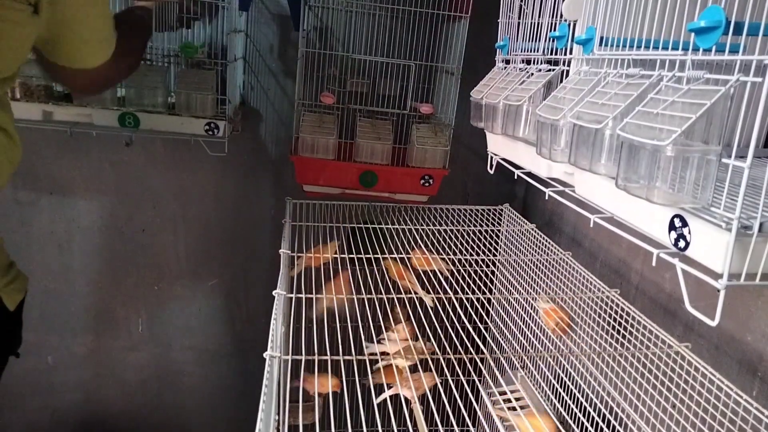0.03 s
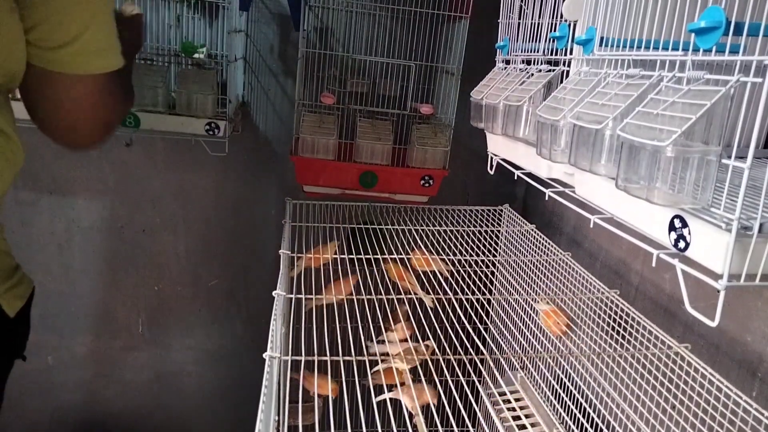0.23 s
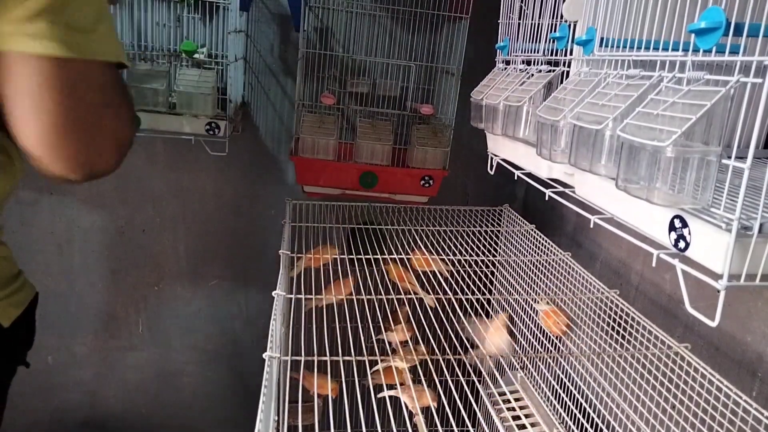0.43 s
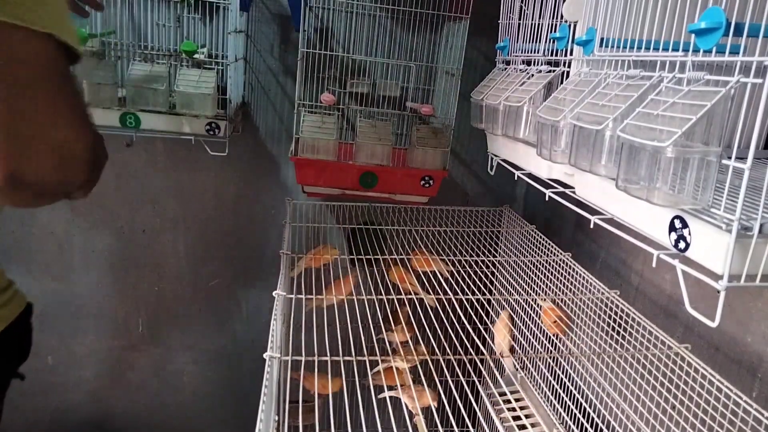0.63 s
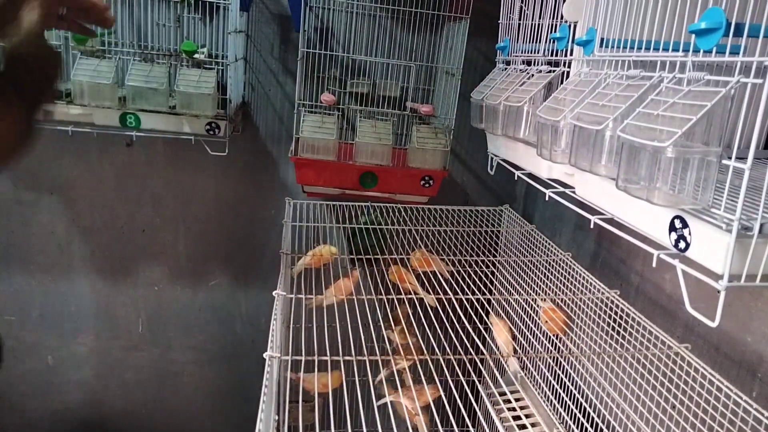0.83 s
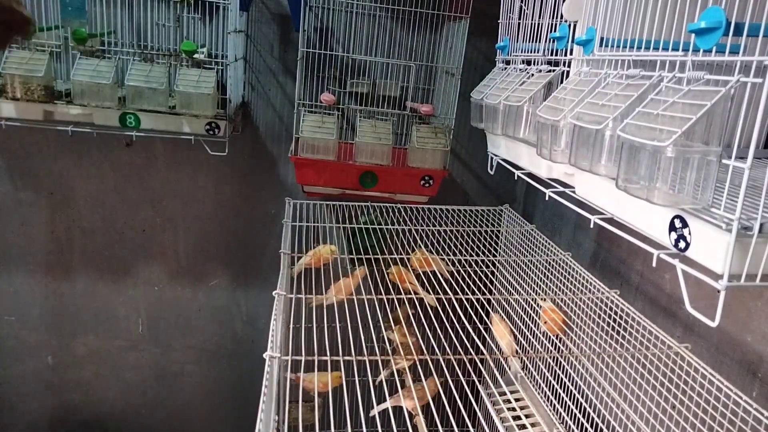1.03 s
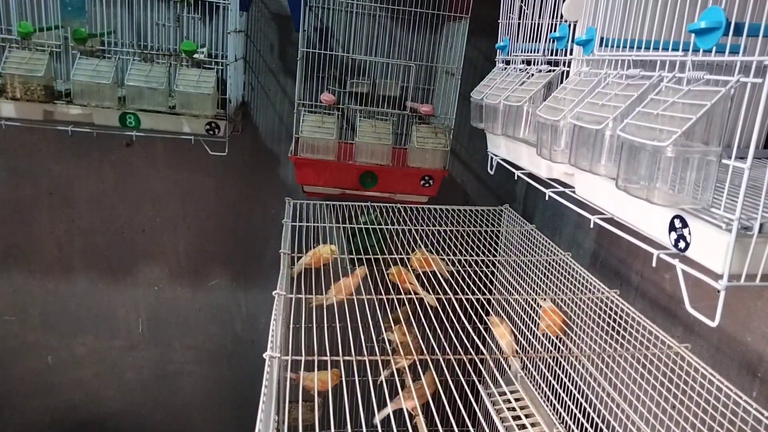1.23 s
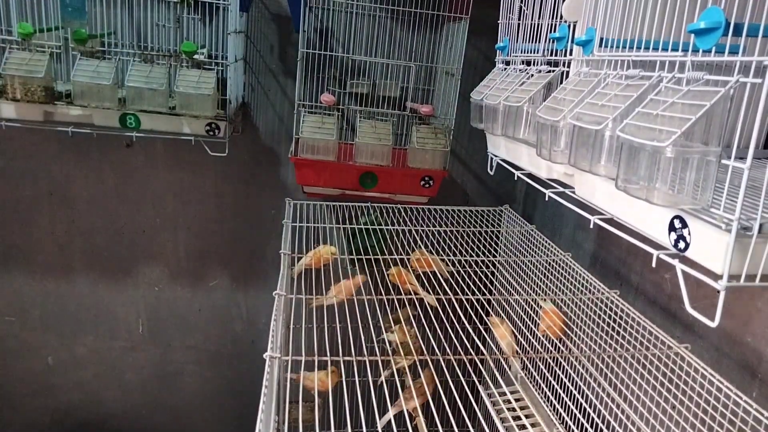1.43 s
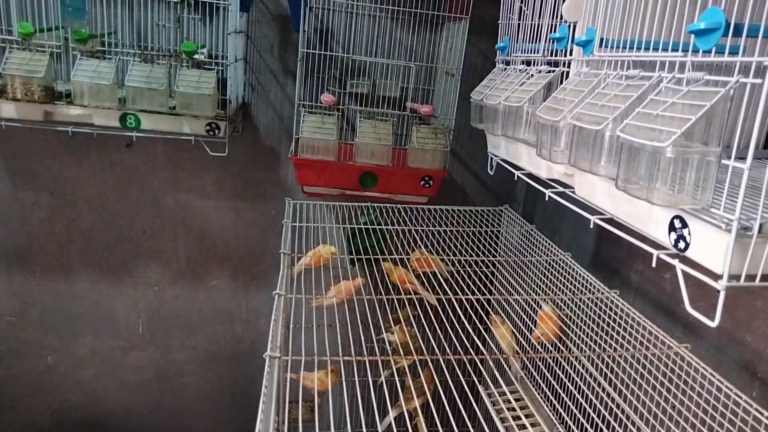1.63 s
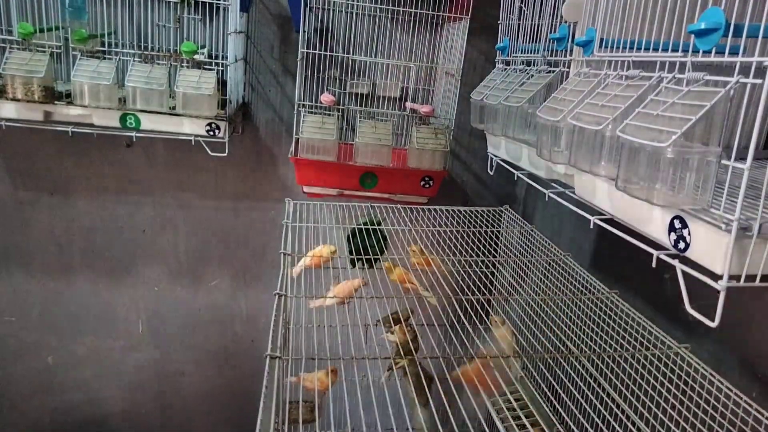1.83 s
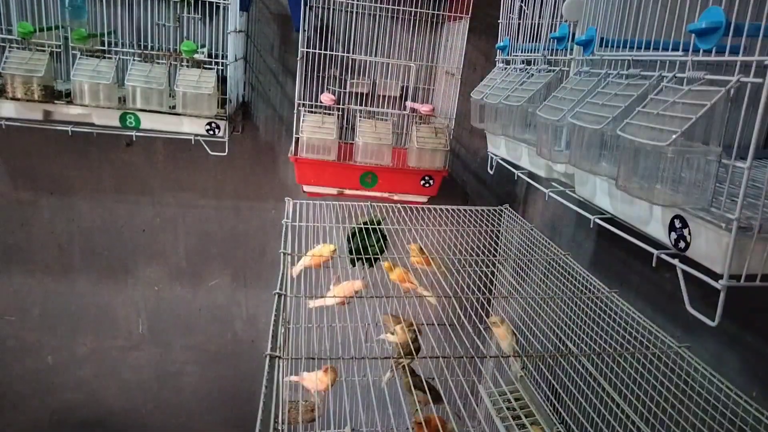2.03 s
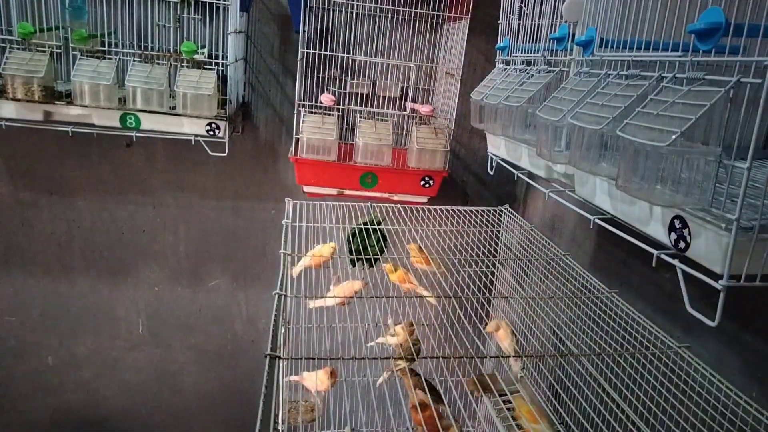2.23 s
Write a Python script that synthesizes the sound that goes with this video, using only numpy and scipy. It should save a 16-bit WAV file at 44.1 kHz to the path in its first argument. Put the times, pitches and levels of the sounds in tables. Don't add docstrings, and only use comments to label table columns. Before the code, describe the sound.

Canary chirps in a cage, close to a phone in a hard-walled room with faint hiss and rumble. From 0 to 0.7 s, feathers swish, claws tick on wire, husks chink and a plastic feeder scrapes hollowly. At 0.73-1.04 s one call rises, rough then clear, with a quick echo. Wings flutter at 1.42-1.6 s; overlapping squabbling chirps follow until 1.86 s, ending in a falling whistle. Rustles and ticks continue.

```python
import sys
import numpy as np
from scipy import signal
from scipy.fft import rfft, irfft
from scipy.io import wavfile

SR = 44100
rng = np.random.default_rng(int(sys.argv[2]) if len(sys.argv) > 2 else 0)


def generate_wav(sig):
    pcm = np.round(np.clip(np.atleast_2d(sig).T, -1, 1) * 32767).astype(np.int16)
    wavfile.write(sys.argv[1], SR, pcm)


def elevation(decibels):
    levels = np.asarray(decibels, float)
    return 10 ** (levels / 20)


N = 101165
T = np.arange(N) / SR
BIN_HZ = np.arange(N // 2 + 1) * SR / N


def shape(points, hz):
    p = np.array(points)
    return np.interp(np.log(np.maximum(hz, 1)), np.log(p[:, 0]), p[:, 1], left=-90)


def filtered_noise(gain):
    y = irfft(rfft(rng.standard_normal(N)) * gain, N)
    return y / y.std()


def noise(points):
    return filtered_noise(elevation(shape(points, BIN_HZ)))


def ring(hz, width_hz):
    return filtered_noise(1 / (1 + (2 * (BIN_HZ - hz) / width_hz) ** 2))


def walk(hz):
    return ring(0, 2 * hz)


def burst(start, rise, t60, bend=1):
    u = T - start
    attack = np.sin(np.clip(u / max(rise, 1e-4), 0, 1) * np.pi / 2) ** 2
    return attack * elevation(-60 * (np.maximum(u - rise, 0) / t60) ** bend)


# f/Hz, level/dB
HISS_COLOUR = [(250, 0), (978, -4), (4300, -17), (6500, -13.5), (8400, -2), (10500, -11.5), (15500, -11)]
# f/Hz, level/dB
RUMBLE_COLOUR = [(18, 2), (45, 0.5), (83, -8), (114, -20.5), (155, -12.5), (200, -21.5)]


def background():
    hiss = elevation(-65.5 + 1.3 * walk(5.6)) * noise(HISS_COLOUR)
    rumble = elevation(-60 + 2.43 * walk(12)) * noise(RUMBLE_COLOUR + [(400, -40)])
    return hiss + rumble


# t/s, rise/s, fade t60/s, level/dB, share of low colour/0-1
SWISHES = [(0, 0.01, 0.71, -54, .3), (0.308, 0.011, 0.95, -62.5, 1), (.41, 0.0083, .3, -56.5, 0.34),
           (.65, 0.0076, 1, -60.5, 0.78), (.703, .006, 0.088, -51, 0), (0.946, 0.011, 0.34, -47.5, 0.72),
           (1.233, 0.041, .3, -49, 0.45), (1.379, 0.013, 0.6, -60.5, 0.34),
           (1.728, 0.07, 0.27, -49.5, 0.65), (1.96, 0.04, 0.32, -51, 0.32),
           (2.047, 0.0059, 0.12, -58.5, 0.97), (2.253, 0.021, 0.19, -56, 0.4),
           (1.869, 0.0067, 0.74, -62, 0.4), (0.501, .04, 1, -66.5, 0), (1.158, 0.023, 0.9, -57.5, 0.28),
           (1.62, 0.035, 1, -62.5, 0.3), (1.47, .03, 1, -68, 0.9)]
# f/Hz, level/dB
BRIGHT_COLOUR = [(200, 3), (1000, -10.5), (5000, -19.5), (7000, -3.5), (8400, 4), (10000, -4.5),
                 (15500, -1)]
# f/Hz, level/dB
DULL_COLOUR = [(100, -8.5), (400, 0.5), (1200, 0), (3000, -0.5), (6000, -4), (8400, -4), (15500, -11)]


def swishes():
    bright, dull = noise(BRIGHT_COLOUR), noise(DULL_COLOUR)
    out = 0
    for start, rise, t60, db, dull_share in SWISHES:
        dull_share = np.clip(dull_share, 0, 1)
        friction = (1 - dull_share) * bright + dull_share * dull
        out = out + elevation(db) * burst(start, rise, t60, bend=1.283) * friction
    return out


# t/s, level/dB
DRAG = [
    (0, -71.5),
    (.25, -70),
    (0.292, -64),
    (0.344, -49),
    (.43, -59.5),
    (.5, -62),
    (.64, -65.5),
    (0.679, -54.5),
    (0.848, -75.5),
]
# f/Hz, bandwidth/Hz, level/dB
FEEDER_MODES = [
    (890, 96, -5.5),
    (966, 178, -3),
    (1430, 270, -12.5),
    (1975, 140, -18),
]


def feeder_drone():
    body = sum(elevation(db) * ring(hz, width_hz) for hz, width_hz, db in FEEDER_MODES)
    t, db = np.array(DRAG).T
    return body / body.std() * elevation(np.interp(T, t, db, right=-100) + 3.5 * walk(18))


# f/Hz, level/dB
BREATH_COLOUR = [(800, -17), (2000, -13), (5000, -2), (8000, 10), (11000, -4), (15500, 0)]


def voice(rows, partial_db, count):
    breath_db, rough_hz, edge_s = 1.5, 456, 0.0043
    flicker_db, fray = 0.8147, 0.2
    t, *tracks = np.array(rows).T
    hz, db, rough, tilt_db = (np.interp(T, t, track) for track in tracks)
    gate = np.clip(np.minimum(T - t[0] + edge_s, t[-1] + edge_s - T) / edge_s, 0, 1)
    jitter = 1 + 0.00427 * walk(58)
    phase = 2 * np.pi * np.cumsum(hz * jitter) / SR

    gains = []
    for k in range(1, count + 1):
        gains.append(elevation(partial_db(k, hz) + tilt_db * (k - 2)) * (k * hz < 16000))
    gains = np.array(gains)
    gains = gains / np.sqrt((gains ** 2).sum(axis=0) / 2)

    out = np.clip(rough, 0, 1) * elevation(breath_db) * noise(BREATH_COLOUR)
    for k, gain in enumerate(gains, 1):
        share = np.clip(rough * (1 + fray * k), 0, 1)
        steady = np.sin(k * phase)
        shake = walk(rough_hz * k / 4) * np.sin(k * phase) + walk(rough_hz * k / 4) * np.cos(k * phase)
        partial = np.sqrt(1 - share ** 2) * steady + share * shake / np.sqrt(2)
        out = out + gain * elevation(flicker_db * k * walk(42)) * partial
    return gate * elevation(db) * out


# start t/s, end t/s, start f/Hz, end f/Hz, level/dB
THIN_NOTES = [
    (1.76, 1.832, 6285, 6335, -50),
    (0, .06, 2670, 2680, -70),
    (1.63, 1.71, 1780, 2030, -62),
    (1.63, 1.668, 3560, 3850, -51),
    (.04, .21, 1360, 1335, -74),
]


def thin_notes():
    out = 0
    for t0, t1, hz0, hz1, db in THIN_NOTES:
        glide = [(t0, hz0, db - 1, 0.3, 0), (t1, hz1, db, 0.25, 0)]
        out = out + voice(glide, lambda k, hz: 0, count=1)
    return out


# t/s, peak level/dB
CLAW_TICKS = [(0.022, -39), (0.0772, -40), (0.0944, -45), (0.1488, -41), (0.2389, -57), (0.2748, -49),
              (0.3, -46.5), (0.3242, -42), (0.401, -52), (0.417, -42), (0.5072, -45), (1.0284, -34.5),
              (1.1722, -63), (1.4014, -49.5), (1.4226, -56), (1.9255, -46), (2.0504, -40), (2.097, -42),
              (2.269, -43)]


def claw_ticks():
    hits = sum(elevation(db - 11) * burst(t, 0.0011, 0.051) for t, db in CLAW_TICKS)
    return noise(BRIGHT_COLOUR) * hits


# t/s, level/dB
HUSKS = [
    (.054, -54),
    (0.448, -52),
]


def husk_chinks():
    return ring(8500, 1100) * sum(elevation(db) * burst(t, 0.0034, 0.14) for t, db in HUSKS)


# t/s, pitch f/Hz, level/dB, roughness/0-1, overtone tilt/dB per partial
RISING_CALL = [
    (.728, 1358, -54.5, 0.77, -0.5),
    (.752, 1552, -41, .45, 1),
    (.79, 1838, -43, 0.38, 0.5),
    (.833, 2115, -39.5, 0.07, 0),
    (.877, 2342, -49.5, 0.1, 0.5),
    (.915, 2512, -43.5, 0, 0.5),
    (.965, 2586, -41, 0, -3.5),
    (.995, 2705, -40, 0.15, 1),
    (1.042, 2720, -57.5, 0.2, -3),
]
# f/Hz, level/dB
THROAT = [(1300, -4), (2600, -9.5), (3600, 0.5), (4600, -1.5), (5400, 5.5), (6500, -3), (9500, -17),
          (15500, -13)]


def rising_call():
    call = voice(RISING_CALL, lambda k, hz: shape(THROAT, k * hz), count=9)
    echo_s, echo_db = 0.021, -4
    return call + elevation(echo_db) * np.roll(call, int(echo_s * SR))


# t/s, level/dB
WING_STROKES = [
    (1.423, -46.5),
    (1.475, -39),
    (1.527, -41),
    (1.578, -40.5),
]


def wing_beats(grain):
    def pulse(centre, width_s):
        return np.exp(-((T - centre) / width_s) ** 2 / 2)

    air = rustle = 0
    for t, db in WING_STROKES:
        push = pulse(t + 0.005, 0.0039)
        rebound = pulse_rebound(t, 0.0088)
        air = air + elevation(db) * (0.55 * rebound - push)
        rustle = rustle + elevation(db - 12.5) * burst(t, 0.0016, 0.3)
    return air + noise(BRIGHT_COLOUR) * rustle * grain


def pulse_rebound(t, width_s):
    return np.exp(-((T - t - 0.02) / width_s) ** 2 / 2)


# t/s, pitch f/Hz, level/dB, roughness/0-1, overtone tilt/dB per partial
HELD_VOICE = [(1.612, 1330, -59.5, .2, 2), (1.628, 1580, -47.5, 0.5, -12), (1.65, 1669, -46.5, 0.36, -9),
              (1.675, 1759, -42.5, 0.35, 7), (1.695, 1850, -54, 0.25, -7), (1.74, 1865, -43.5, 0.16, -1.5),
              (1.772, 1851, -46.5, 0.17, -1), (1.786, 1773, -46.5, 0.18, -4), (1.832, 1764, -53, 0.2, 4.5)]
HELD_PARTIALS = [-30, 0, -22, -8, -28]


def held_voice():
    return voice(HELD_VOICE, lambda k, hz: HELD_PARTIALS[k - 1], count=len(HELD_PARTIALS))


# t/s, pitch f/Hz, level/dB, roughness/0-1, overtone tilt/dB per partial
UPPER_VOICE = [(1.62, 1566, -51, 0.66, 32), (1.635, 1680, -44.5, 1, 20), (1.658, 1740, -47, 1, 9),
               (1.675, 1816, -45.5, 0.54, -5.5), (1.688, 1881, -32.5, 0.15, 1.5),
               (1.705, 1897, -47, 0.45, 3), (1.73, 1853, -44.5, 0.51, -1), (1.77, 1833, -52.5, 0.58, 5.5),
               (1.81, 1880, -62, 0.74, 9)]
UPPER_PARTIALS = [-30, -18, -10, 0, -24, -24]


def upper_voice():
    return voice(UPPER_VOICE, lambda k, hz: UPPER_PARTIALS[k - 1], count=len(UPPER_PARTIALS))


# t/s, pitch f/Hz, level/dB, roughness/0-1, overtone tilt/dB per partial
FALLING_WHISTLE = [(1.715, 2200, -57, .4, 4), (1.74, 2310, -58.5, 0.39, 5), (1.768, 2460, -56, .3, 8),
                   (1.78, 2716, -60, .2, -11), (1.797, 2790, -43.5, 0.17, -2.5),
                   (1.812, 2776, -44, 0.15, 5), (1.826, 2780, -40.5, 0.48, 5.5),
                   (1.838, 2200, -47.5, 0.5, 0), (1.856, 1925, -55.5, 0.43, -5)]
WHISTLE_PARTIALS = [-4, 0, -40]


def falling_whistle():
    return voice(FALLING_WHISTLE, lambda k, hz: WHISTLE_PARTIALS[k - 1], count=len(WHISTLE_PARTIALS))


def room(x):
    t = T[:SR // 2]
    response = 0
    for t60, db in (0.025, -6), (0.23, -11.5):
        tail = rng.standard_normal(len(t)) * elevation(-60 * t / t60) * (t > 0.002)
        response = response + elevation(db) * tail / np.sqrt((tail ** 2).sum())
    return x + signal.fftconvolve(x, response)[:N]


def scene():
    grain = elevation(2.24 * walk(85))
    cage = (swishes() + claw_ticks() + husk_chinks()) * grain
    birds = thin_notes() + rising_call() + held_voice() + upper_voice() + falling_whistle()
    return (background() + cage + feeder_drone() + room(birds) + wing_beats(grain))[None]


def roll_off(x):
    return signal.sosfilt(signal.butter(12, 16320, fs=SR, output="sos"), x)


def record(dry):
    low_pass = signal.ellip(10, 0.2, 70, 15700, fs=SR, output="sos")
    return roll_off(signal.sosfilt(low_pass, dry))


dry = scene()
out = record(dry)
generate_wav(out)
```